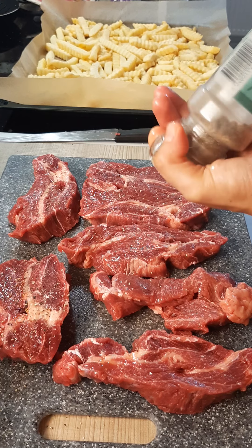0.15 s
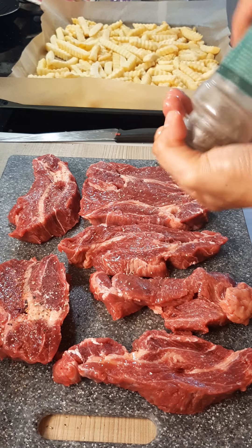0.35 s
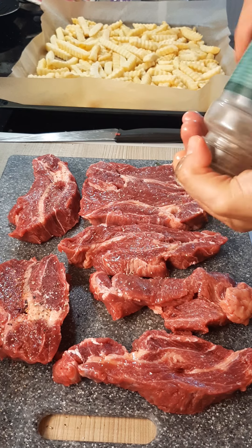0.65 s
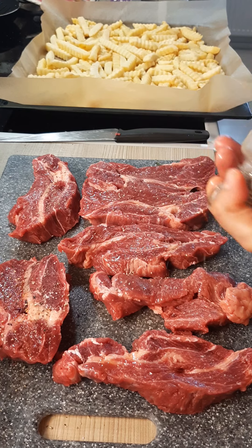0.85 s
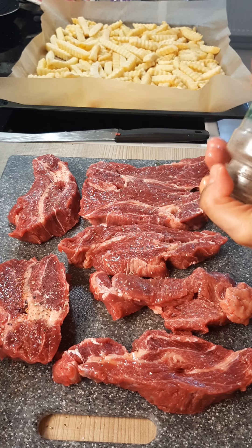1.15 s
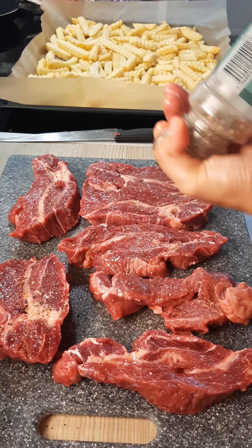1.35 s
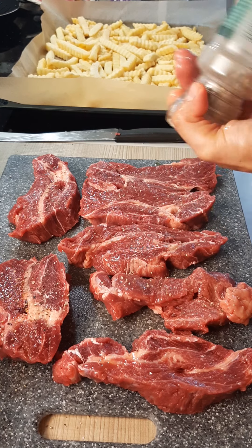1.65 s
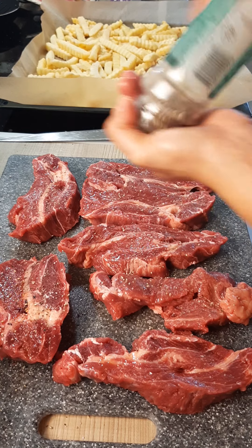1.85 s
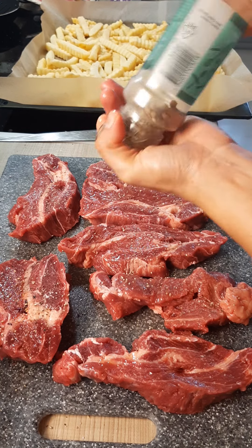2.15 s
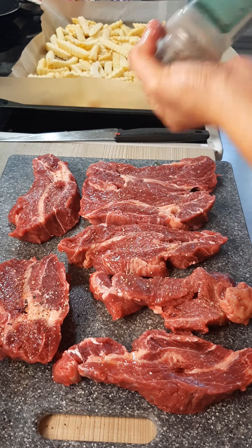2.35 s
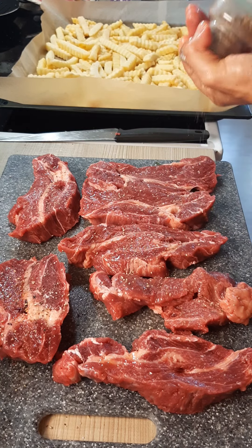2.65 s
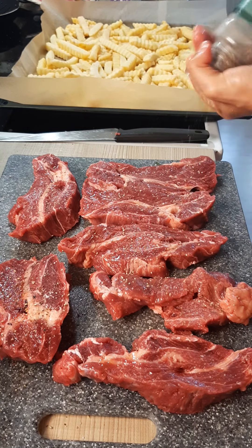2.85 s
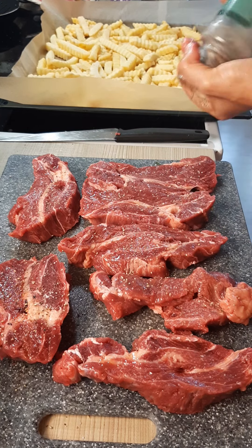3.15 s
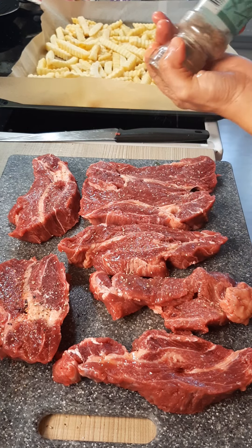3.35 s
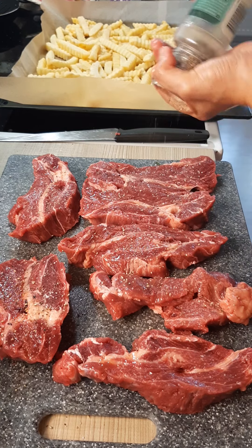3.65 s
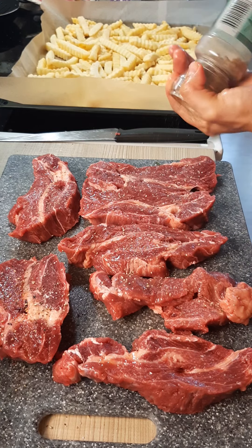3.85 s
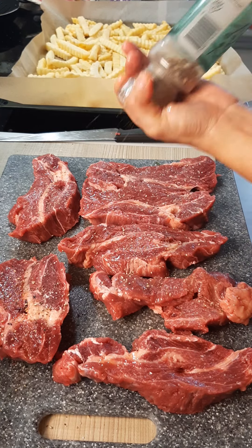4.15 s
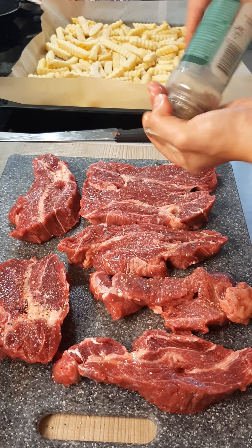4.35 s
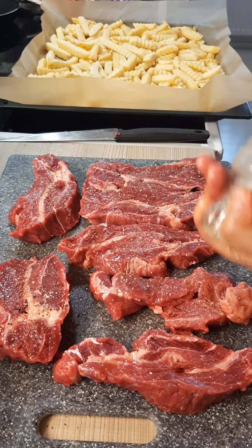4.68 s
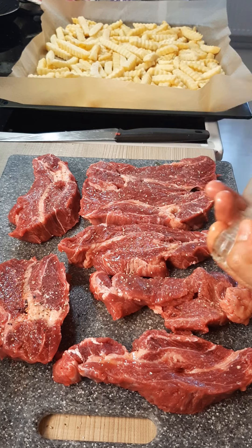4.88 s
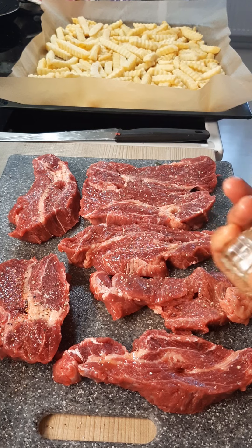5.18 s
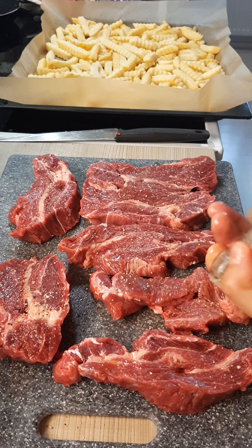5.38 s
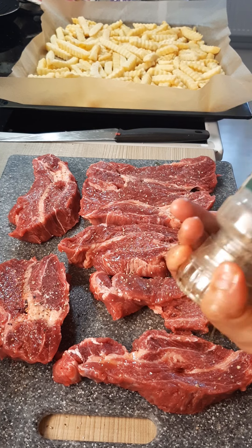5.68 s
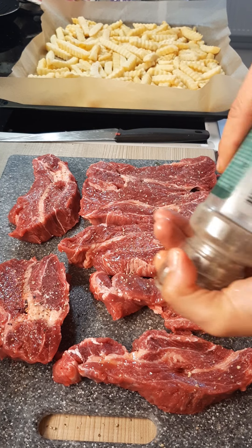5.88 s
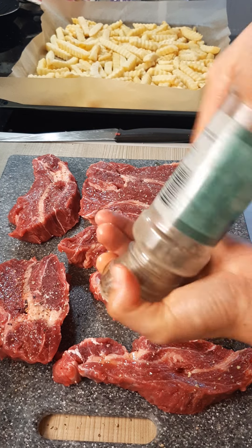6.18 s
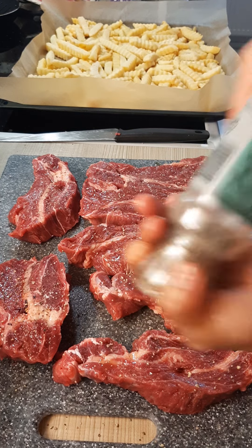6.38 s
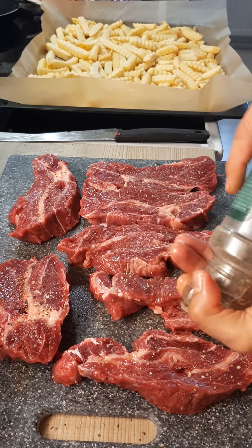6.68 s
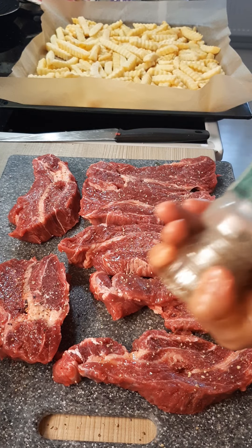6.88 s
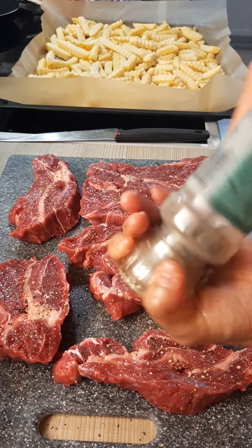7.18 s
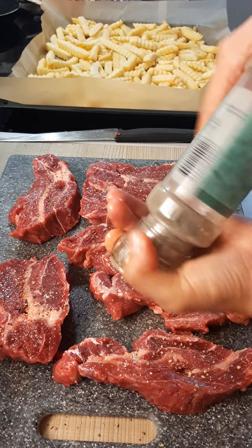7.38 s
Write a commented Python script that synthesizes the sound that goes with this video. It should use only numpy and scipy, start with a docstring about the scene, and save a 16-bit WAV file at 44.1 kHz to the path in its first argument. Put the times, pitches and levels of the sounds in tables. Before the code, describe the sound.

A plastic pepper grinder is twisted back and forth about five times a second, crunching and cracking peppercorns close by in a small kitchen.

```python
"""A plastic pepper mill is twisted to and fro in a small kitchen, about five strokes a second.
Corns crack as sharp bursts of noise, over a crunch of crumbs made from a dense shower of tiny ticks.
The plastic jar rings briefly through resonant filters; the worktop and walls answer with fading noise echoes.
Behind it an appliance rumbles faintly: low noise that swells slowly, with a trace of hiss."""
import sys
import numpy as np
from scipy import signal
from scipy.fft import rfft, irfft, next_fast_len
from scipy.io import wavfile
from scipy.ndimage import uniform_filter1d, map_coordinates

SR = 44100
rng = np.random.default_rng(int(sys.argv[2]) if len(sys.argv) > 2 else 0)


def store_wav(level_fs):
    """Save 16-bit WAV to argv[1]."""
    pcm = np.round(np.clip(np.atleast_2d(level_fs), -1, 1) * 32767)
    wavfile.write(sys.argv[1], SR, pcm.T.astype(np.int16))


N = 332073
T = np.arange(N) / SR  # time in seconds

# Colour of the appliance rumble. Each row: frequency in Hz, relative level per Hz in dB.
RUMBLE_COLOUR = [(25, -38), (45, -9.5), (65, -12.5), (81, 1), (100, -6), (124, -6), (150, -17.5),
                 (215, -3.5), (260, -27), (312, -16.5), (415, -38), (700, -59)]
# How the rumble swells. Each row: time in seconds, level in dB.
RUMBLE_SWELL = [(0.0, -56.5), (2.75, -58.5), (3.61, -55), (4.55, -62), (5.51, -54.5), (5.68, -56.5),
                (6.56, -57), (7.13, -58), (7.53, -57)]
# Colour of the hiss. Each row: frequency in Hz, relative level per Hz in dB.
HISS_COLOUR = [(300, 7), (988, -15), (1540, -2), (4080, 3), (9000, -3), (16000, -5)]
# How alike background and echoes are on the two sides. Each row: frequency in Hz, likeness from 0 to 1.
LEFT_RIGHT_LIKENESS = [(30, 0.62), (80, 0.95), (200, 0.95), (400, 0.57), (700, 0.13), (1400, 0),
                       (16000, 0.074)]
# Echoes of the kitchen. Each row: frequency in Hz, worktop level in dB, seconds for it to fall 60 dB,
# walls level in dB, seconds for it to fall 60 dB.
ECHOES = [(305, -2.5, 0.072, -14, 0.31), (1080, -3.5, 0.091, -12.5, 0.43), (2300, 7, 0.058, -4.5, 0.33),
          (6350, -3.5, 0.043, -13, 0.3), (12900, -1.5, 0.077, -15, 0.26)]
# Rings of the plastic jar. Each row: frequency in Hz, width in Hz, gain of the added ring in dB.
JAR_RINGS = [(340, 9.6, -25), (828, 149, 4.5), (1453, 38, -1), (1548.4, 35, 4), (1990, 48, -9),
             (2790, 400, -4.5), (5880, 370, -6)]
# Where the mill is. Each row: time in seconds, milliseconds by which the left side hears it first
# (before the sway), left minus right level in dB.
MILL_PLACE = [(0, 0.15, 0.5), (2, 0.21, -0.1), (4.4, 0.21, 0), (5, 0.038, -0.5), (6.2, 0.026, -1.5),
              (7.53, 0.038, -1)]
# Edges in Hz of the four bands of the mill's sound: low knock, jar body, rasp and treble snap.
BAND_EDGES_HZ = [230, 1100, 2300, 8000, 17000]
# Twists of the wrist. Each row: start in seconds, seconds to full pressure, length in seconds,
# crunch level at the first bite in dB, crunch level at full pressure in dB (both before the flicker and trim).
STROKES = [(0, 0.053, 0.12, -30.5, -26.5), (0.218, 0.06, 0.14, -46.5, -25),
           (0.387, 0.073, 0.11, -46, -23.5), (0.599, 0.095, 0.16, -50.5, -32),
           (0.801, 0.061, 0.13, -45.5, -26), (1.031, 0.011, 0.13, -43, -32),
           (1.219, 0.036, 0.15, -43.5, -27.5), (1.421, .06, 0.17, -39.5, -35),
           (1.633, 0.081, .19, -40.5, -27.5), (1.832, 0.1, 0.16, -46.5, -36.5),
           (2.052, 0.081, .2, -34, -42.5), (2.326, 0.054, 0.13, -51, -29), (2.499, 0.03, 0.17, -42, -27),
           (2.728, 0.049, 0.23, -41, -38), (2.899, 0.057, 0.12, -32, -20.5), (3.09, 0.078, .16, -43.5, -28),
           (3.298, 0.042, .2, -43, -22), (3.528, 0.083, 0.14, -37.5, -35), (3.709, 0.039, 0.21, -41, -26),
           (3.96, 0.0022, 0.16, -44, -26.5), (4.099, 0.028, 0.098, -44, -21.5),
           (4.262, 0.098, 0.25, -68, -43), (4.616, 0.039, 0.12, -56, -34), (4.926, 0.055, 0.14, -51.5, -40),
           (5.117, 0.04, 0.18, -45, -26.5), (5.29, 0.16, 0.22, -55.5, -30.5),
           (5.569, 0.037, .19, -21.5, -25), (5.807, 0.09, 0.11, -35, -32.5),
           (5.971, 0.05, 0.14, -39.5, -21), (6.187, 0.052, .12, -65, -29.5),
           (6.389, 0.076, 0.14, -40, -27.5), (6.61, 0.059, .14, -34, -27), (6.794, 0.091, 0.14, -33, -29),
           (6.976, 0.095, 0.15, -57, -26), (7.179, 0.056, .14, -26, -25), (7.391, 0.062, 0.14, -42, -29.5)]
# Single cracks and knocks, loud ones and faint lone ones. Each row: time in seconds,
# crack level in dB before the trim, how hard it jolts the jar relative to that in dB.
CRACKS = [(0.018, -38, 4.5), (0.048, -22, -8), (0.0988, -29.5, 2.5), (.2482, -37.5, 5), (0.257, -20.5, -6),
          (0.3113, -16.5, -3), (0.3975, -28, -0.5), (0.4338, -32.5, 5.5), (.4674, -25, 2.5),
          (0.483, -19, -1.5), (.6393, -37, -0.5), (0.669, -33.5, 1), (0.7046, -24, 4.5),
          (0.8245, -41.5, 8.5), (0.8345, -29, 1), (0.8495, -23, 2), (0.8868, -25, -11), (.9055, -24.5, 3),
          (1.0469, -25.5, 1), (1.0868, -29.5, 1), (1.132, -35, 0), (1.249, -29.5, 4.5), (1.2645, -17.5, 1),
          (1.2916, -26.5, 5.5), (1.449, -36.5, 2.5), (1.5054, -19.5, -1), (1.6682, -31.5, 3.5),
          (1.6999, -20, -10), (1.7127, -22, 1), (1.901, -23, -3), (1.949, -36, 0), (2.056, -32.5, 5),
          (2.078, -26.5, 1.5), (2.127, -18, -3.5), (2.1791, -20, -2), (2.1953, -26, -7.5),
          (2.3783, -27.5, -8), (2.4403, -39.5, -15), (2.5076, -38.5, 3), (2.5286, -30, 2),
          (2.5627, -32.5, 8.5), (2.7445, -39, -10), (2.8103, -39, 6), (2.909, -23.5, -8.5),
          (2.9313, -27, 2), (2.9598, -23, 2), (2.998, -38, -18), (3.1445, -31, 2), (3.3109, -33.5, 1),
          (3.3205, -27, 4), (3.3465, -15.5, -3), (3.381, -21, -3), (3.4027, -20.5, -8), (3.5615, -24, -1),
          (3.6139, -21.5, -22), (3.7373, -20.5, -6), (3.7626, -28.5, -7), (3.782, -15, -7.5),
          (3.8502, -16.5, -3.5), (3.9674, -24, -9.5), (4.121, -38, 12), (4.1315, -25.5, -13),
          (4.147, -20.5, -8), (4.275, -45, -17), (4.3178, -43, -18), (4.359, -45.5, -19), (4.385, -61, 12),
          (4.465, -42.5, -23), (4.6439, -34, 3), (4.6845, -32.5, -4), (4.7525, -23.5, -12.5),
          (4.9412, -41, -16), (4.977, -39.5, 1.5), (5.004, -39, 4), (5.041, -46.5, -7), (5.143, -29.5, 0),
          (5.1675, -25, -2), (5.2145, -31.5, -3.5), (5.224, -29, 3.5), (5.2455, -30, -2),
          (5.3015, -35, -16), (5.352, -33.5, -24), (5.395, -46, -8), (5.4166, -32, 1), (5.4601, -33, 1.5),
          (5.4774, -26, -2), (5.5793, -25, 7), (5.6015, -22, 4), (5.6272, -17.5, 0.5), (5.657, -21.5, -9),
          (5.6779, -23.5, -2.5), (5.7098, -32.5, -8), (5.83, -20.5, -0.5), (5.8699, -25.5, 4),
          (5.888, -18.5, -6.5), (5.978, -30.5, 7.5), (6.0122, -24, 4), (6.047, -29, -4), (6.0592, -25, 6),
          (6.201, -42, 5.5), (6.233, -26.5, 2.5), (6.2445, -31.5, 5), (6.285, -38.5, 5.5),
          (6.3979, -27, 0.5), (6.444, -23, -1.5), (6.466, -24, -6), (6.5059, -22.5, -6.5),
          (6.6178, -40, -4), (6.6463, -30.5, 3), (6.6654, -28, 4), (6.702, -36, -1), (6.7969, -31, -7.5),
          (6.8222, -26.5, -0.5), (6.8477, -22, 0), (6.864, -19, -8), (6.912, -32.5, 0), (7.011, -45, 7),
          (7.0508, -36, -4), (7.0659, -24.5, 0.5), (7.0896, -35, 5), (7.1835, -26.5, 5), (7.207, -27, 1),
          (7.223, -31, -1), (7.2336, -26.5, 4), (7.409, -38.5, 9), (7.443, -26, -2), (7.4648, -28, 2)]
# Tone of the microphone. Each row: frequency in Hz, gain in dB.
MIC_TONE = [(25, -2.5), (100, 3.5), (3000, 1), (6000, 3.5), (7800, 2), (9000, -4), (10500, 2), (12500, 1),
            (15500, -2), (16200, -38), (17500, -40)]

HISS_DB = -69
EASE_DB = -24.5  # fall of the crunch from full pressure to the end of a twist
# Level of the crunch's jar part, relative to the rasp, at first bite, full pressure and end of a twist
JAR_BITE_DB, JAR_FULL_DB, JAR_END_DB = -4, -3, -1.5
# The low knock grows with the jolt; knock and snap also differ by chance
KNOCK_PER_JOLT, KNOCK_SCATTER_DB, SNAP_SCATTER_DB = 1.64, 1.5, 5
COLOUR_DB = 4  # how strongly each shell favours its own broad frequency regions
TOP_HZ, CEILING = 16900, .9  # treble cut-off, and the size at which peaks are rounded off


def undb(db):
    """Turns decibels into an amplitude factor."""
    return 10 ** (np.asarray(db) / 20)


def rms(x):
    """Root-mean-square size of a signal."""
    return np.sqrt(np.mean(x ** 2))


def colour(x, table, curve=undb):
    """Weights a signal by a (Hz, value) table, with straight lines on a log-frequency axis."""
    size = next_fast_len(x.shape[-1])
    hz, value = np.transpose(table)
    bins_hz = np.arange(size // 2 + 1) * SR / size
    gain = curve(np.interp(np.log(bins_hz + 1), np.log(hz), value))
    return irfft(rfft(x, size) * gain, size)[..., :x.shape[-1]]


def band(x, k):
    """Cuts out the k-th band, overlapping its neighbours so they add up flat; white noise keeps its power."""
    lo, hi = BAND_EDGES_HZ[k:k + 2]
    share = [(lo / 1.2, 0), (lo * 1.2, 1), (hi / 1.2, 1), (hi * 1.2, 0)]
    return colour(x, share, np.asarray) * np.sqrt(SR / 2 / (hi - lo))


def noise_pair(size, likeness):
    """Left and right noise, as alike as the table says: a shared part plus an opposite part."""
    mid, side = rng.standard_normal((2, size))
    mid = colour(mid, likeness, lambda c: np.sqrt((1 + np.clip(c, 0, 1)) / 2))
    side = colour(side, likeness, lambda c: np.sqrt((1 - np.clip(c, 0, 1)) / 2))
    return np.array([mid + side, mid - side])


def rumble():
    """An appliance's low noise swells slowly, over a steady trace of hiss."""
    low = colour(noise_pair(N, LEFT_RIGHT_LIKENESS), RUMBLE_COLOUR)
    hiss = colour(noise_pair(N, LEFT_RIGHT_LIKENESS), HISS_COLOUR)
    swell = undb(np.interp(T, *np.transpose(RUMBLE_SWELL)))
    return low / rms(low) * swell + hiss / rms(hiss) * undb(HISS_DB)


def kitchen(x, worktop_ms=0.9, walls_ms=19.2, size=26000):
    """Worktop and hands scatter a short dense echo, the walls a longer one that builds up more slowly."""
    t = np.arange(size) / SR
    hz = [row[0] for row in ECHOES]
    near = noise_pair(size, LEFT_RIGHT_LIKENESS)
    far = noise_pair(size, LEFT_RIGHT_LIKENESS)
    echo = 0
    for k, (_, near_db, near_t60, far_db, far_t60) in enumerate(ECHOES):
        share = list(zip(hz, np.eye(len(hz))[k]))  # 1 at this frequency, 0 at the other rows
        worktop = (near, near_db, near_t60, worktop_ms)
        walls = (far, far_db, far_t60, walls_ms)
        for noise, db, t60, build_ms in (worktop, walls):
            build = np.clip(t / (build_ms / 1000), 0, 1) ** 2
            fade = np.exp(-np.log(1000) * t / t60) * build
            fade = fade / np.sqrt(np.sum(fade ** 2))
            echo = echo + undb(db) * fade * colour(noise, share, np.asarray)
    return signal.fftconvolve(x[None], echo, axes=1)[:, :N]


def jar(x):
    """The plastic jar adds its short rings to whatever shakes it, one resonant filter per ring."""
    rings = 0
    for hz, width, db in JAR_RINGS:
        b, a = signal.iirpeak(hz, hz / width, fs=SR)
        rings = rings + undb(db) * signal.lfilter(b, a, x)
    return x + rings


def crunch(per_s=1200., scatter_db=4.0, knock_db=-10.5, direct_db=-10.0, flicker_db=4.5, grip_ms=1.3):
    """Crumbs split in a dense shower of unequal ticks; the pressure flickers as corns feed in."""
    chance = rng.random((3, N))
    size_db = np.minimum(-scatter_db * np.log(1 - chance[2]), 15)  # many small ticks, few big ones
    ticks = (chance[0] < per_s / SR) * np.sign(chance[1] - .5) * undb(size_db)
    steps = np.repeat(rng.standard_normal(N // 300 + 1), 300)
    feed = uniform_filter1d(steps, 300)[:N]  # random levels joined by smooth ramps
    knock, body, rasp, snap = (band(ticks / rms(ticks), k) for k in range(4))
    jar_part = body + undb(knock_db) * knock
    bright_part = rasp + snap
    out = np.zeros(N)
    jar_part_db = [JAR_BITE_DB, JAR_FULL_DB, JAR_END_DB]
    for start, rise, length, bite_db, full_db in STROKES:
        s = [start, start + rise, start + max(length, rise + .01)]
        db = [bite_db, full_db, full_db + EASE_DB]
        span = slice(int(s[0] * SR), min(int(s[-1] * SR), N))
        t = T[span]
        grip = np.clip((t - s[0]) / (grip_ms / 1000), 0, 1)  # the burrs bite in about a millisecond
        mix = bright_part[span] + undb(np.interp(t, s, jar_part_db)) * jar_part[span]
        out[span] += grip * undb(np.interp(t, s, db)) * mix
    return undb(direct_db + flicker_db * feed) * out


def cracks(burst_ms=0.49, splinter=0.56, knock_db=-15.5, jar_db=-2.0, snap_db=-0.5, direct_db=-5.0, size=256):
    """Each break is one sharp step with splinters after it; its jolt sets how much the jar answers."""
    s, crack_db, jolt_db = np.transpose(CRACKS)
    chance = rng.standard_normal((len(s), size + 2))
    fade = np.exp(-np.arange(size) / SR / (burst_ms / 1000))
    burst = splinter * chance[:, 2:] * fade
    burst[:, 0] = 1  # the sharp step
    # A snap this short is white: even out its spectrum so only fine ripples stay, then tint it
    tint = 3 * uniform_filter1d(rng.standard_normal((len(s), size // 2 + 1)), size=9, axis=1)
    spectrum = rfft(burst, axis=1)
    smooth = np.sqrt(uniform_filter1d(np.abs(spectrum) ** 2, size=5, axis=1))
    burst = irfft(spectrum / smooth * undb(COLOUR_DB * tint), axis=1)
    lead = size // 8  # room for what the evening-out spreads ahead of the step
    burst = np.roll(burst, lead, axis=1)
    burst /= np.sqrt(np.mean(burst ** 2, axis=1, keepdims=True))
    knock = knock_db + KNOCK_PER_JOLT * jolt_db + KNOCK_SCATTER_DB * chance[:, 0]
    body = jolt_db + jar_db
    rasp = 0 * s
    snap = snap_db + SNAP_SCATTER_DB * chance[:, 1]
    levels_db = crack_db + np.array([knock, body, rasp, snap])
    out = 0
    for k, db in enumerate(levels_db):
        train = np.zeros(N + size)
        for i, gain, shape in zip((s * SR).astype(int) - lead, undb(db), burst):
            train[i:i + size] += gain * shape
        out = out + band(train[:N], k)
    return undb(direct_db) * out  # the echoes supply the rest of each crack's level


def scene(count=5, hold_s=.1, sway_ms=0.048):
    """Places the mill between left and right, adds its changing echoes and the background rumble."""
    mill = jar(cracks() + crunch())
    s, lead_ms, pan_db = np.transpose(MILL_PLACE)
    pan_db = np.interp(T, s, pan_db)
    # The hands rock the mill from side to side, so the delay of the right side sways
    steps = np.repeat(rng.standard_normal(N // 2000 + 1), 2000)
    sway = uniform_filter1d(steps, 1000)[:N]
    lag = (np.interp(T, s, lead_ms) + sway * sway_ms) * SR / 1000  # in samples
    right = map_coordinates(mill, [np.arange(N) - lag], order=3)
    direct = np.array([mill, right])
    # The mill wanders over the worktop, so its echo paths keep changing: spots take turns and cross-fade
    hold = int(hold_s * SR)
    spot = np.arange(N) // hold % count
    echo = 0
    for k in range(count):
        turn = np.sqrt(uniform_filter1d(1. * (spot == k), hold // 2))
        echo = echo + kitchen(mill * turn)
    return (direct + echo) * undb(np.array([pan_db, -pan_db]) / 2) + rumble()


def record(dry):
    """The microphone dips near 9 kHz, the loudest peaks are rounded and the top is cut."""
    toned = colour(dry, MIC_TONE)
    rounded = CEILING * np.tanh(toned / CEILING)
    top_cut = signal.ellip(8, .2, 70, TOP_HZ, fs=SR, output="sos")
    return signal.sosfilt(top_cut, rounded)


dry = scene()
out = record(dry)
store_wav(out)
```